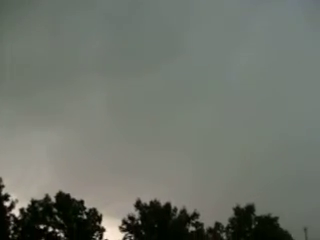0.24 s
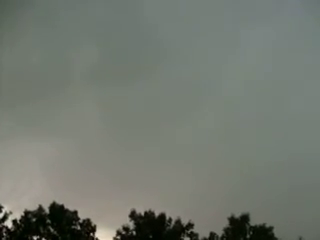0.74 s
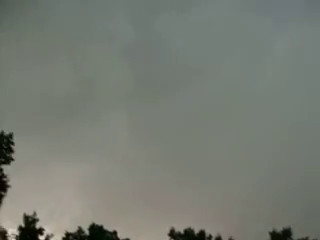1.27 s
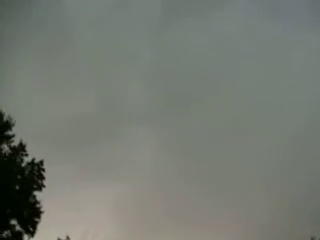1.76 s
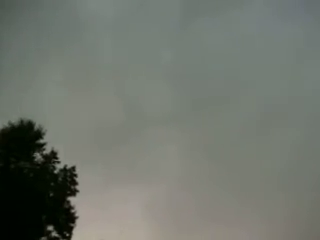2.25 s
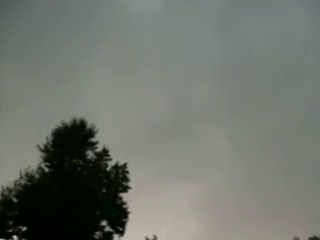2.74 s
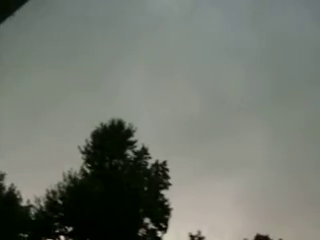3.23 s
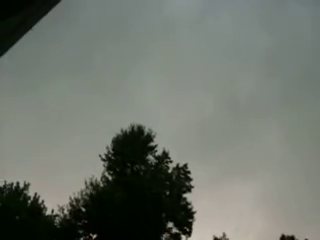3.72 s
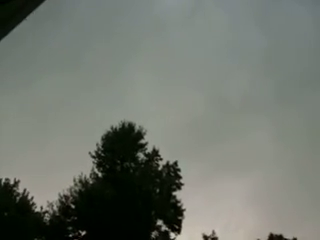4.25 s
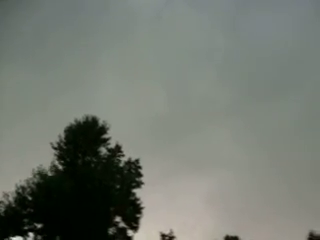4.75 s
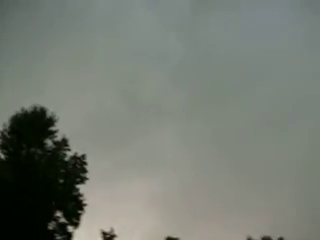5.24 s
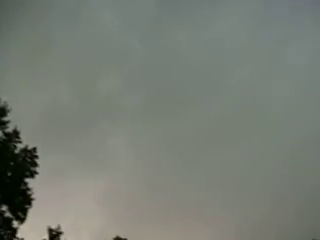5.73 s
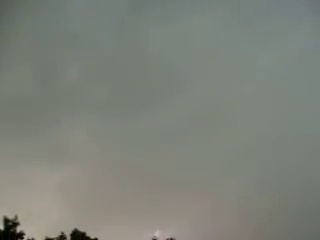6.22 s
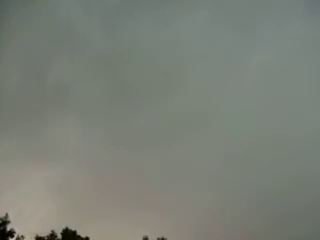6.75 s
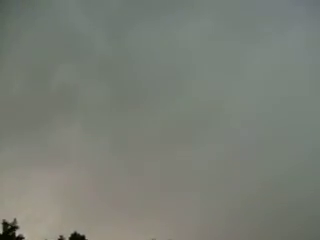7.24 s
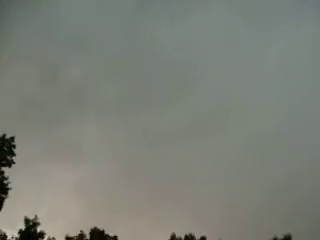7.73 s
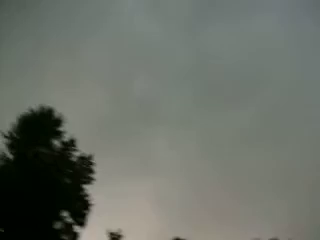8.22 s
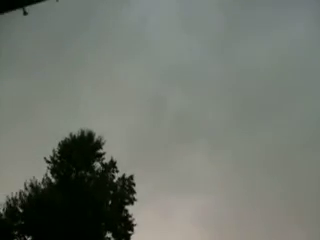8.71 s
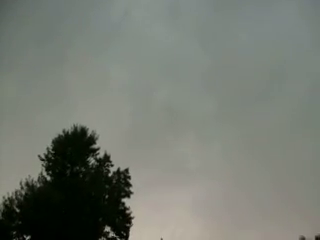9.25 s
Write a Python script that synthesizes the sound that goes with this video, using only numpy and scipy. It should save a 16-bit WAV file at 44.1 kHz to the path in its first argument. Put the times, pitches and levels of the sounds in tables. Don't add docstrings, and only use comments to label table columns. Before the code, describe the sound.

Steady rain hisses and patters on leaves, with ticking drops and light wind puffs, until a violent, ragged thunderclap cracks and rolls, overloading the microphone.

```python
import sys
import numpy as np
from scipy import signal
from scipy.fft import rfft, irfft
from scipy.io import wavfile

SR = 44100
rng = np.random.default_rng(int(sys.argv[2]) if len(sys.argv) > 2 else 0)


def unload_wav(signal):
    wavfile.write(
        sys.argv[1],
        SR,
        np.round(np.clip(np.atleast_2d(signal).T, -1, 1) * 32767).astype(np.int16),
    )


N = 418068


def from_db(db):
    return 10 ** (np.asarray(db) / 20)


def rms_one(x):
    return x / np.sqrt(np.mean(x ** 2) + 1e-20)


def in_time(rows):
    s, *columns = np.transpose(rows)
    return [np.interp(np.arange(N) / SR, s, c) for c in columns]


def at_hz(points, hz):
    point_hz, point_db = np.transpose(points)
    return np.interp(np.log(hz), np.log(point_hz), point_db)


def drift(rate_hz, size=N):
    r = np.exp(-40 * np.pi * rate_hz / SR)
    noise = rng.standard_normal(size // 20 + 4002)
    slow = signal.lfilter([1], [1, -2 * r, r * r], noise)[4000:]
    return np.interp(np.arange(size) / 20, np.arange(len(slow)), rms_one(slow))


def band(x, low_hz, high_hz):
    sos = signal.butter(2, [low_hz, min(high_hz, SR / 2.2)], "band", fs=SR, output="sos")
    return signal.sosfilt(sos, x)


def coloured(x, spectrum):
    hz = np.maximum(np.fft.rfftfreq(len(x), 1 / SR), 1)
    return irfft(rfft(x) * from_db(at_hz(spectrum, hz)), len(x))


def impacts(per_s, spread_db, size=N):
    sizes = from_db(spread_db * np.minimum(rng.exponential(1, size), 3))
    sizes = sizes * rng.choice([-1, 1], size)
    return rms_one(sizes * (rng.random(size) < per_s / SR))


def add(out, s, burst):
    at = round(s * SR)
    out[at:at + len(burst)] += burst[:len(out) - at]


# time in seconds, level in dB, treble above the level in dB.
RAIN = [
    (0.0, -22.5, 1),
    (0.99, -23.5, 0.5),
    (4.28, -22.5, -1.5),
    (6.78, -22, -0.5),
    (7.54, -21.5, -1.5),
]
# frequency in Hz, density in dB per Hz.
RAIN_COLOUR = [(18, -45), (40, -26), (82, -15), (202, -6), (300, -4), (500, -1.5), (1000, -1.5),
               (3110, -2.5), (5690, -1), (7500, -8), (9500, -16.5), (11000, -23.5), (12000, -41.5),
               (12600, -45)]


def rain():
    level_db, treble_db = in_time(RAIN)
    white = [coloured(w, RAIN_COLOUR) for w in rng.standard_normal((2, N))]
    together = drift(7.5)
    edges_hz = 40 * 2 ** np.arange(0, 8.6, .5)
    hiss = 0
    for k, (low, high) in enumerate(zip(edges_hz, edges_hz[1:])):
        lift_db = treble_db * np.clip(np.log2(high / 4000), 0, 1)
        flicker_db = 0.49 * together + 0.35 * drift(7.2)
        hiss = hiss + from_db(lift_db + flicker_db) * band(white[k % 2], low, high)
    patter = impacts(per_s=710, spread_db=4.5) * from_db(2.5 * drift(21))
    patter = rms_one(band(coloured(patter, RAIN_COLOUR), 6230, 15200))
    mix = rms_one(hiss) + from_db(-11.0) * patter + from_db(-16.5) * splashes() + gutter()
    return from_db(level_db + 0.77) * mix


def splashes():
    hits = impacts(per_s=90, spread_db=4.5)
    dealt = rng.integers(0, 10, N)
    out = 0
    for k, hz in enumerate(np.geomspace(1300, 6500, 10)):
        r = from_db(-60 * hz / (45 * SR))
        w = 2 * np.pi * hz / SR
        ring = [1, -2 * r * np.cos(w), r * r]
        out = out + signal.lfilter([np.sin(w)], ring, hits * (dealt == k) + 1e-18)
    return rms_one(out)


def gutter():
    hz, width_hz, level_db = 586, 16, -26
    hum = band(rng.standard_normal(N), hz - width_hz / 2, hz + width_hz / 2)
    return from_db(level_db + 1.5 * drift(0.54)) * rms_one(hum)


def thunder():
    cut_hz = 7800
    low_pass = signal.butter(4, cut_hz, fs=SR, output="sos")
    return signal.sosfilt(low_pass, roar() + shock_packets())


THUNDER_BANDS = [22, 100, 450, 1500, 3800, 9000]
# frequency in Hz, density in dB per Hz.
THUNDER_COLOUR = [(35, -49), (60, -17.5), (307, 4), (398, -1), (569, 6), (2750, -7), (7000, -25),
                  (9100, -84), (15400, -120)]
RANGE_DB = [-13.5, -0.5, -1, -4.5]
RANGE_FOLLOWS = [0.71, 0.061, 0.99, 0.69]


def roar():
    start = round(7.5 * SR)
    size = N - start
    t = np.arange(start, N) / SR
    ageing_db_s = [5.5, 0, 0, -4.5]
    shocks = impacts(per_s=2700, spread_db=0.0, size=size) + 1.19 * rng.standard_normal(size)
    shocks = coloured(shocks, THUNDER_COLOUR)
    clumps_db = 0.34 * drift(28, size=size)
    mix = 0
    for k, range_db in enumerate(RANGE_DB):
        low, top, high = THUNDER_BANDS[k:k + 3]
        part = coloured(shocks, [(low / 2, -40), (low, -14), (top, 0), (high, -14), (high * 2, -40)])
        level_db = range_db + ageing_db_s[k] * (t - t[0]) + clumps_db + 1.64 * drift(37, size=size)
        mix = mix + from_db(level_db) * rolls(t, RANGE_FOLLOWS[k]) * rms_one(part)
    out = np.zeros(N)
    out[start:] = from_db(-5) * mix * (np.arange(size) < size - 100)
    return out


# start in seconds, length in seconds, level in dB, brightness in dB.
ROLLS = [(7.548, .035, -22, 7), (7.6, .055, -24, 6), (7.658, 0.057, -7, -6.5), (7.749, .15, -21, 0.5),
         (7.846, 0.05, -25.5, 7.5), (7.9, 0.088, -19.5, 9), (7.999, 0.12, -17, 3),
         (8.122, 0.067, -6.5, -6.5), (8.2, 0.14, -14, -4.5), (8.296, .1, -12, -0.5), (8.42, .16, -8.5, -6),
         (8.596, 0.22, -12.5, -2), (8.844, 0.13, -19.5, 3), (8.969, 0.12, -11.5, -0.5),
         (9.104, 0.051, -9, -1), (9.185, 0.089, -22, 1.5), (9.266, 0.091, -10, -10), (9.37, 0.12, -19, -2)]


def rolls(t, follows):
    attack_s, release_s = 0.015, 0.041
    power = 0
    for s, length, level_db, bright_db in ROLLS:
        rise = np.clip((t - s) / attack_s, 0, 1)
        fall = np.exp(-np.maximum(t - s - length, 0) / release_s)
        power = power + (from_db(level_db + follows * bright_db) * rise * fall) ** 2
    return np.sqrt(power)


# crest in seconds, level in dB, length in seconds.
CRACKS = [(7.556, -20, .016), (7.591, -9, 0.0067), (7.609, -6, 0.014), (7.68, -13.5, 0.018),
          (7.725, -10, .006), (7.875, -20, .007), (7.904, -12, 0.0065), (7.921, -16.5, 0.01),
          (7.937, -19, .022), (7.976, -10, 0.0035), (7.986, -14, .006), (8.063, -18, .008),
          (8.082, -13.5, 0.024),  (8.123, -21, .01), (8.182, -12, .007), (8.321, -22, .012),
          (8.351, -11, .015), (8.38, -16, .017), (8.404, -19, .006), (8.431, -15, .013), (8.64, -19, .012),
          (8.663, -17, .009), (8.787, -21, .016), (8.972, -15, .019), (8.997, -21, .014),
          (9.027, -17, .015), (9.058, -17, .008), (9.088, -17, .02), (9.138, -12, .005),
          (9.275, -22, 0.016)]
# crest in seconds, level in dB, centre in Hz, length in seconds.
BANGS = [(7.557, -16.5, 740, .008), (7.589, -12.5, 650, .011), (7.611, -9, 920, 0.012),
         (7.675, -11, 710, 0.022), (7.726, -7, 580, .022), (7.771, -14.5, 770, 0.035),
         (7.92, -16, 816, .044), (8.085, -10, 705, 0.032), (8.168, -2, 670, 0.033), (8.24, -17, 620, 0.014),
         (8.324, -9.5, 750, .014), (8.368, -11, 670, 0.037), (8.405, -9.5, 646, 0.013),
         (8.426, -8, 580, .008), (8.462, -6.5, 533, 0.036), (8.511, -23, 630, 0.018),
         (8.542, -19, 580, .009), (8.569, -10, 650, 0.03), (8.623, -12, 575, .039),
         (8.749, -9.5, 700, 0.077), (8.806, -12, 660, 0.012), (8.86, -16, 694, 0.035),
         (8.902, -20, 660, .009), (9.015, -12, 680, .044), (9.09, -10, 625, .011), (9.128, -10, 597, 0.023),
         (9.268, -12, 587, .006), (9.289, -8.5, 575, 0.039), (9.353, -10, 880, 0.024),
         (9.466, -16, 730, .02)]
# crest in seconds, level in dB, centre in Hz, length in seconds.
BOOMS = [(7.583, -18.5, 355, .032), (7.681, -10, 344, .023), (7.712, -19, 260, .025),
         (7.73, -13.5, 376, .025), (8.155, -27, 100, .057), (8.176, -21, 350, 0.048),
         (8.367, -13, 380, 0.021), (8.439, -16, 380, .023), (8.502, -21, 143, .056),
         (8.503, -7.5, 308, .056), (8.604, -18, 390, .022), (8.608, -29, 130, .033),
         (8.691, -11.5, 317, .054), (8.796, -11.5, 287, 0.046), (8.823, -23, 120, 0.05),
         (8.863, -12, 217, .028), (9.006, -27, 119, 0.049), (9.017, -13, 300, .032),
         (9.076, -13, 304, .014), (9.122, -29, 120, .05), (9.157, -5, 310, 0.069), (9.284, -13, 333, .02),
         (9.313, -10, 275, 0.04), (9.401, -19, 322, .013)]


def shock_packets():
    packets = [(s, db, 1610, 1.36, length) for s, db, length in CRACKS]
    packets += [(s, db, hz, 0.75, length) for s, db, hz, length in BANGS]
    packets += [(s, db, hz, 0.62, length) for s, db, hz, length in BOOMS]
    out = np.zeros(N)
    for s, level_db, hz, octaves, length in packets:
        add(out, s - 2048 / SR, clap(level_db + .5, hz, octaves, length))
    return out


def clap(level_db, hz, octaves, length):
    t = np.arange(-2048, 2048) / SR / max(length, .003)
    shocks = impacts(per_s=3700, spread_db=2.0, size=6144)
    shocks = band(shocks, hz * 2 ** (-.5 * octaves), hz * 2 ** (.5 * octaves))[2048:]
    shape = np.exp(-(t / np.where(t < 0, .6, .33)) ** 2)
    burst = shape * shocks
    return from_db(level_db) * burst * np.sqrt(np.sum(shape ** 2) / np.sum(burst ** 2))


# time in seconds, peak in dB.
TICKS = [(0.2004, -26), (0.3201, -12), (0.3244, -11), (0.7421, -20), (1.2039, -20), (1.3512, -18),
         (1.984, -21), (2.3795, -25), (3.7268, -24), (3.7968, -21), (3.8939, -25), (4.8253, -11),
         (4.8298, -11.5), (5.1665, -27), (5.2425, -26), (5.8094, -8), (6.5389, -16), (6.5713, -25),
         (6.8588, -25), (6.9007, -23), (7.2067, -20), (7.2784, -26), (7.3787, -24), (7.4665, -11)]
# start in seconds, peak in dB, pitch in Hz, width in Hz, length in seconds.
DRIPS = [(1.152, -15, 2000, 350, .045), (1.158, -19, 1600, 350, .04), (1.172, -20, 900, 800, .02),
         (2.105, -17, 4300, 900, .015), (2.708, -16, 4800, 1000, .035), (3.47, -17, 5000, 1000, .02),
         (4.499, -16.5, 840, 40, .018), (6.19, -17, 4500, 1200, .02), (7.228, -15.5, 830, 40, .02),
         (7.23, -24, 1040, 60, .03), (7.232, -22, 2250, 250, .012), (7.318, -22, 830, 80, .02),
         (7.465, -21, 460, 80, .025)]


def near_drops():
    drips, snaps = np.zeros(N), np.zeros(N)
    for s, peak_db in TICKS:
        add(snaps, s + .0004, from_db([min(peak_db, -12) + 14]))
    for s, peak_db, hz, width_hz, length in DRIPS:
        add(drips, s, packet(peak_db, hz, width_hz, length, rise=.4))
    return drips + 1.15 * band(band(snaps, 5000, 10000), 3000, 10500)


def packet(peak_db, hz, width_hz, length, rise):
    t = np.arange(4096) / SR / length
    noise = band(rng.standard_normal(6144), max(hz - width_hz / 2, 15), hz + width_hz / 2)[2048:]
    burst = noise * (t / rise) * np.exp(1 - t / rise)
    return from_db(peak_db) * burst / np.max(np.abs(burst))


# centre in seconds, level in dB, length in seconds.
GUSTS = [(.1, -57, .3), (.75, -51, .08), (1.17, -44, 0.16), (1.44, -42, .1), (1.6, -37, .14),
         (1.99, -41, .1), (2.17, -36.5, 0.14), (2.35, -37, .06), (2.6, -39, .12), (2.1, -45, .9),
         (3.0, -54, .4), (3.82, -41, 0.081), (4.05, -48, .15), (5.04, -45, .1), (5.37, -46, .14),
         (5.7, -48, 0.34), (5.95, -47, .14), (6.66, -49, .3), (7.24, -50, .3)]
# start in seconds, peak in dB, pitch in Hz, length in seconds.
PUFFS = [(1.46, -28, 150, 0.017), (1.555, -26, 150, .016), (1.583, -20, 153, 0.015),
         (1.59, -20.5, 258, 0.014), (1.65, -23, 150, 0.012), (1.816, -24, 70, 0.026),
         (1.974, -17, 158, 0.011), (2.136, -26, 110, 0.015), (2.16, -33, 60, 0.027), (2.209, -33, 55, .03),
         (2.35, -29, 54.5, .025), (2.47, -32, 60, .03), (2.572, -14.5, 131, 0.025),
         (2.579, -11.5, 230, 0.0085), (3.791, -29, 80, 0.025), (5.06, -37, 60, .03)]


def wind():
    t = np.arange(N) / SR
    flow = from_db(-55.5)
    for s, level_db, length in GUSTS:
        flow = flow + from_db(level_db) * np.exp(-(2 * (t - s) / length) ** 2)
    out = flow * from_db(1.4 * drift(9.3)) * rms_one(band(rng.standard_normal(N), 28, 141))
    t = np.arange(4096) / SR
    for s, peak_db, hz, length in PUFFS:
        shape = np.exp(-(4 * t / length - 2) ** 2 / 2)
        add(out, s, from_db(peak_db) * np.sin(2 * np.pi * hz * t) * shape)
    return out


# pitch in Hz, rms level in dB.
WHINE = [(7849, -49)]


def whine():
    (hz, level_db), = WHINE
    return np.sqrt(2) * from_db(level_db) * np.sin(2 * np.pi * hz * np.arange(N) / SR)


# time in seconds, depth in dB.
KNOCKS = [(7.59, 14), (7.612, 20), (7.69, 22), (7.73, 27), (7.91, 13.5), (7.985, 16), (8.085, 18),
          (8.15, 25), (8.19, 24.5), (8.375, 21), (8.44, 21), (8.51, 25), (8.575, 19), (8.635, 19),
          (8.7, 19), (8.755, 16), (8.815, 21), (8.835, 25), (8.98, 17), (9.03, 17.5), (9.1, 15), (9.16, 22),
          (9.3, 20), (9.32, 24), (9.35, 16)]


def ducking():
    recovery_db_s, attack_s = 91, 0.0047
    t = np.arange(N) / SR
    depth_db = np.zeros(N)
    for s, knock_db in KNOCKS:
        depth_db = np.maximum(depth_db, (t >= s) * (knock_db - recovery_db_s * (t - s)))
    r = np.exp(-1 / (attack_s * SR))
    return from_db(-signal.lfilter([1 - r], [1, -r], depth_db))


def scene():
    quiet_sounds = rain() + near_drops() + wind() + whine()
    return (ducking() * quiet_sounds + thunder())[None]


def limiter(x):
    limit_db, recovery_db_s, grip, attack_s = -2.0, 90, .9, 0.00061
    climb_db = recovery_db_s * np.arange(N) / SR
    over_db = grip * np.maximum(20 * np.log10(np.abs(x) + 1e-9) - limit_db, 0)
    held_db = np.maximum.accumulate(over_db + climb_db, axis=-1) - climb_db
    r = np.exp(-1 / (attack_s * SR))
    return x * from_db(-signal.lfilter([1 - r], [1, -r], held_db))


def overload(x):
    ceiling, sharpness = 0.75, 8.3
    return x / (1 + np.abs(x / ceiling) ** sharpness) ** (1 / sharpness)


def thump():
    start_s, level_db, rise_s, decay_s = 7.588, -27, .004, .06
    t = np.maximum(np.arange(N) / SR - start_s, 0)
    return -from_db(level_db) * (1 - np.exp(-t / rise_s)) * np.exp(-t / decay_s)


def roll_off(x):
    return signal.sosfilt(signal.butter(12, 15830, fs=SR, output="sos"), x)


def record(dry):
    top, offset = .705, -.0012
    treble_cut = signal.ellip(14, .5, 110, 12150, fs=SR, output="sos")
    x = signal.sosfilt(treble_cut, overload(limiter(dry)))
    x = x + thump() + offset
    return roll_off(np.clip(x, -top, top))


dry = scene()
out = record(dry)
unload_wav(out)
```